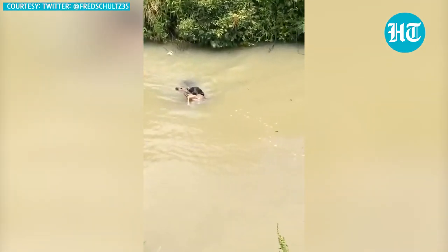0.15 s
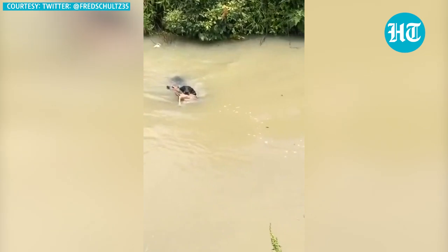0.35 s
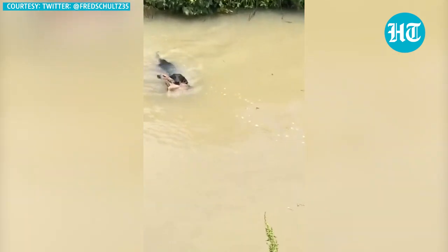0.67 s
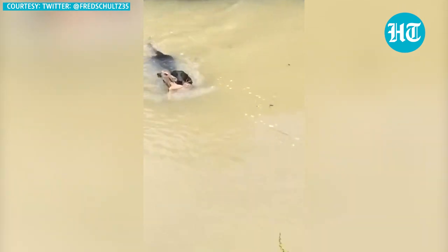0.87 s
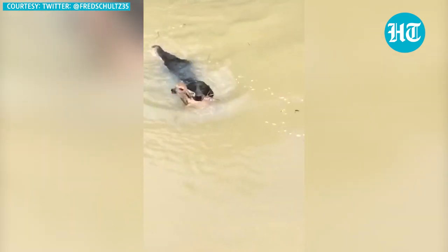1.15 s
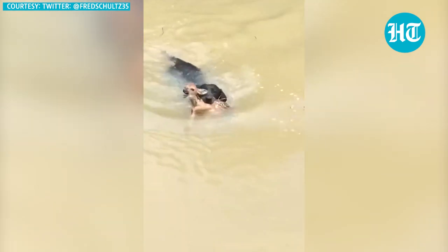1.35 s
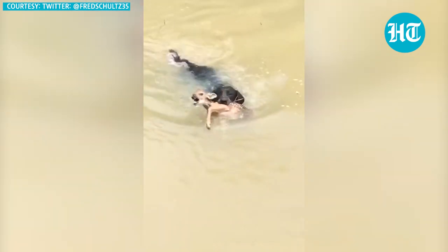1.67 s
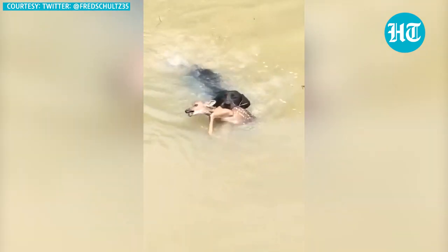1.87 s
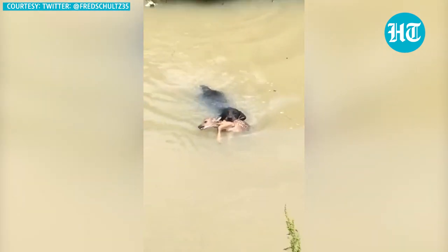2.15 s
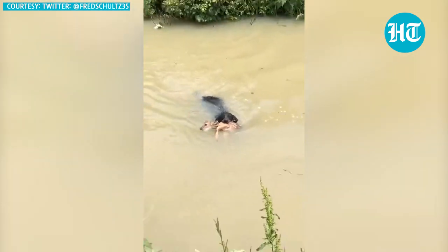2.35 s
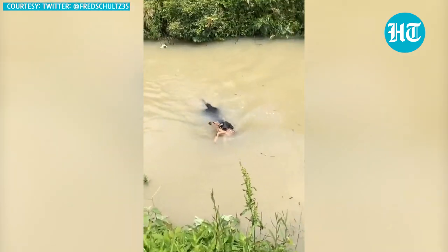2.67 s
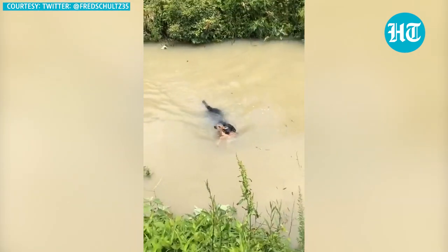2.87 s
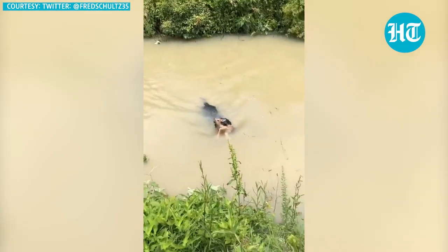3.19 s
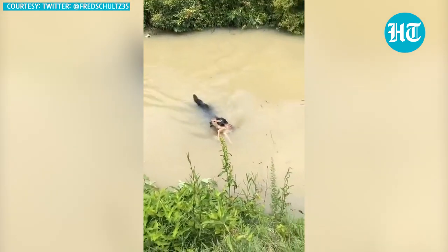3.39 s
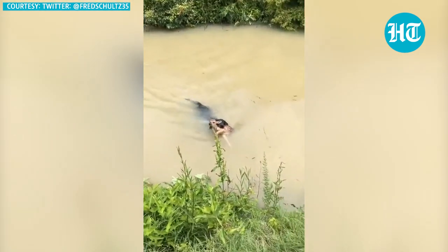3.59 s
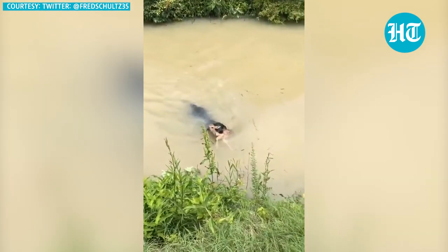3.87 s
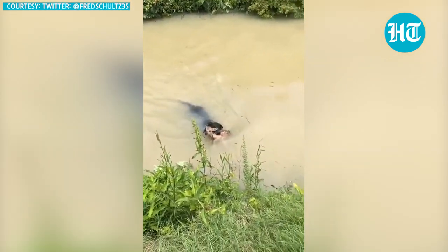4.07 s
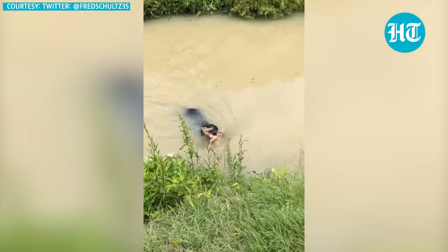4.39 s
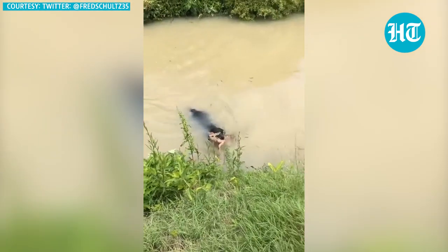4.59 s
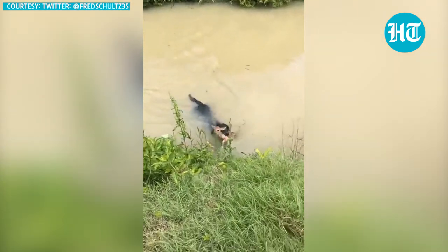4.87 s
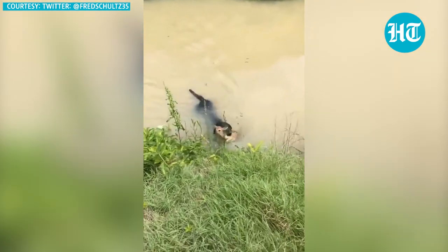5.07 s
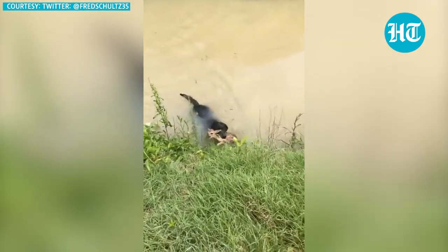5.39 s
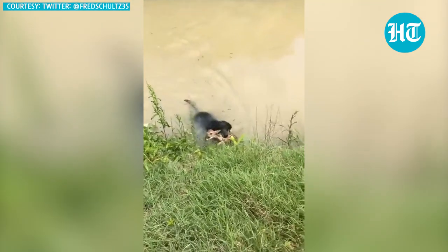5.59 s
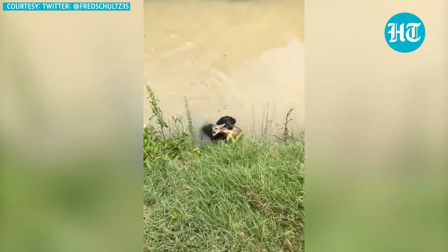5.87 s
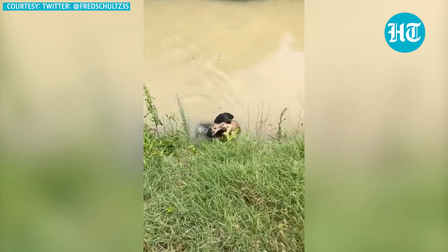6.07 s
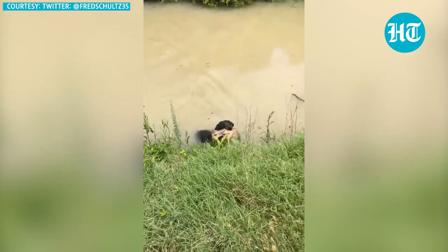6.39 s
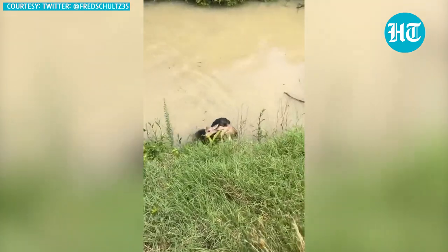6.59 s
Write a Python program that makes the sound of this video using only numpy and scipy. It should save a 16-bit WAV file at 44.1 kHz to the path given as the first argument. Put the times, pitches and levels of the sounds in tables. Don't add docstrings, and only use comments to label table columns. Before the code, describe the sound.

A fawn gives two piercing, strained bleats over a puttering idling engine, lapping muddy water, and a swimming dog's wet snorts.

```python
import sys
import numpy as np
from scipy import signal
from scipy.io import wavfile
from scipy.ndimage import uniform_filter1d

SR = 44100
rng = np.random.default_rng(int(sys.argv[2]) if len(sys.argv) > 2 else 0)


def generate_wav(signal):
    frames = np.transpose(np.atleast_2d(signal))
    scaled = np.clip(frames, -1, 1) * 32767
    pcm = np.round(scaled).astype(np.int16)
    wavfile.write(sys.argv[1], SR, pcm)


def amplitude_ratio(level_db):
    exponent = np.asarray(level_db, float) / 20
    return 10 ** exponent


N = 297234


def at_times(rows):
    s, *columns = np.transpose(rows)
    return [np.interp(np.arange(N) / SR, s, column) for column in columns]


def band(x, low_hz, high_hz):
    return signal.sosfilt(signal.butter(2, [low_hz, high_hz], "band", fs=SR, output="sos"), x)


def unit(x):
    return x / np.sqrt(np.mean(x ** 2) + 1e-20)


def drift(rate):
    r = np.exp(-40 * np.pi * rate / SR)
    slow = signal.lfilter([1], [1, -2 * r, r * r], rng.standard_normal(N // 20 + 3002))[3000:]
    return np.interp(np.arange(N) / 20, np.arange(len(slow)), unit(slow))


def ring(clicks, hz, t60):
    r, w = amplitude_ratio(-60 / (t60 * SR)), 2 * np.pi * hz / SR
    return signal.lfilter([0, np.sin(w)], [1, -2 * r * np.cos(w), r * r], clicks + 1e-18)


def bump(start, length):
    return np.sin(np.pi * np.clip((np.arange(N) / SR - start) / length, 0, 1)) ** 2


def trees(x):
    t = np.arange(int(.6 * SR)) / SR
    tail = band(rng.standard_normal(len(t)), 3000, 4600)
    tail = tail * amplitude_ratio(-60 * t / 0.8) * np.clip(t / .02, 0, 1)
    tail = tail / np.sqrt(np.sum(tail ** 2))
    return signal.fftconvolve(x, tail)[:N] * (1 + .25 * drift(60))


# frequency in Hz, level in dB.
WATER_COLOUR = [(240, -30), (400, -9), (490, -6.5), (676, -5.5), (782, -1.5), (987, -14.5), (1080, -8.5),
                (1570, -9.5), (1930, -9), (2660, -13), (3610, -11), (6750, -33), (13000, -49)]


def river():
    hz, db = np.transpose(WATER_COLOUR)
    edges = 380 * 2 ** np.arange(0, 5.5, 1 / 3)
    white = rng.standard_normal((2, N))
    out, swell = 0, drift(0.87)
    for k, (low, high) in enumerate(zip(edges, edges[1:])):
        colour_db = np.interp(np.log(low * high) / 2, np.log(hz), db)
        flicker_db = .5 * swell + 2.14 * drift(34)
        out = out + amplitude_ratio(colour_db + flicker_db) * band(white[k % 2], low, high)
    return amplitude_ratio(-44) * unit(out)


# start in seconds, peak in dB, note in Hz, t60 in seconds.
DRIPS = [(0.0194, -32.5, 3550, 0.068), (0.5095, -38, 1670, 0.03), (0.8753, -40, 1540, 0.045),
         (2.412, -29, 1560, 0.027), (2.464, -30, 1170, 0.027), (2.9198, -29.5, 3540, 0.018),
         (3.0056, -34.5, 3530, 0.13), (3.3892, -31, 3120, 0.03), (3.4, -27.5, 2710, 0.025),
         (5.03, -36, 1300, 0.057), (6.2714, -29, 3280, 0.034), (6.5194, -29, 2690, 0.022),
         (6.576, -30, 2590, 0.029)]
# start in seconds, peak in dB, note in Hz, t60 in seconds.
GULPS = [(0.489, -32, 600, 0.033), (2.904, -33.5, 684, 0.057), (2.982, -45, 641, 0.05),
         (3.427, -34.5, 1230, 0.046), (5.333, -22.5, 715, 0.035), (5.398, -28.5, 744, 0.049),
         (6.483, -38, 980, 0.062), (6.507, -35, 676, 0.064), (6.581, -31.5, 650, 0.098)]


def drops(rows, rise):
    out, t = np.zeros(N + SR), np.arange(SR // 8) / SR
    for s, db, hz, t60 in rows:
        note = np.sin(2 * np.pi * hz * t * (1 + rise * t))
        start = int(s * SR)
        out[start:start + len(t)] += note * amplitude_ratio(db - 60 * t / t60) * np.clip(t / 0.00085, 0, 1)
    return out[:N]


# start in seconds, peak in dB.
PAW_SLAPS = [
    (1.256, -26),
    (2.287, -26),
    (3.266, -36),
    (4.154, -45),
]
# start in seconds, peak in dB.
TWIG_TICKS = [(0.5294, -54), (0.9153, -48), (1.046, -45.5), (3.4321, -36.5), (3.7294, -54), (3.917, -38),
              (5.055, -48), (6.559, -37)]


def snaps(rows, low_hz, high_hz, t60, lift_db):
    out, t = np.zeros(N + SR), np.arange(SR // 20) / SR
    for s, db in rows:
        start = int(s * SR)
        out[start:start + len(t)] += unit(rng.standard_normal(len(t))) * amplitude_ratio(db + lift_db - 60 * t / t60)
    return band(out[:N], low_hz, high_hz)


# middle in seconds, length in seconds, level in dB.
HISS_SWELLS = [(0.0, .45, -60), (.53, 0.071, -70), (1.29, .28, -56), (1.998, 0.86, -69), (2.253, 0.31, -63),
               (3.273, 0.26, -57), (3.6, 0.41, -71), (4.272, .5, -59), (4.5, 0.41, -58.5), (4.778, 0.51, -55.5),
               (5.306, 0.85, -55), (6.303, 0.6, -59), (6.569, .12, -58), (6.74, 0.38, -61)]


def high_hiss():
    grains = rng.standard_normal(N) * amplitude_ratio(1.0 * drift(120))
    hiss = unit(band(grains, 6700, 10250)) + amplitude_ratio(-4.0) * unit(band(grains, 11200, 14500))
    stirred = sum(amplitude_ratio(db) * bump(s - length / 2, length) for s, length, db in HISS_SWELLS)
    still = amplitude_ratio(-74.5)
    return (still + stirred) * hiss


def rattle(clicks):
    puffs = signal.lfilter([1], [1, -amplitude_ratio(-60 / (.1 * SR))], clicks)
    puffs = uniform_filter1d(puffs, size=200)
    panels = [(156, 205, -35), (339, 377, -46.5)]      # (low Hz, high Hz, dB)
    noise = sum(amplitude_ratio(db) * unit(band(rng.standard_normal(len(clicks)), low, high)) for low, high, db in panels)
    return puffs * noise


# share of the cycle, level in dB.
FIRINGS = [
    (.398, 1),
    (.624, 2.2),
    (.859, -2.6),
]
# resonance in Hz, level in dB, t60 in seconds, polarity.
EXHAUST = [(31, -19.5, 0.49, 1), (38.9, -15, 0.13, -1), (67.5, -10.5, 0.11, 1), (113.6, -28, 0.55, -1),
           (122.5, -25, 0.34, -1), (181, -28, 0.039, -1), (341, -57, 0.13, 1)]
# time in seconds, cycles ahead of a steady idle.
GOVERNOR = [(0.0, -.066), (.35, -.13), (.6, -.087), (1.2, .003), (2.1, -.003), (2.4, -.028), (3.2, -.03),
            (3.85, .038), (4.35, .04), (5.1, -.04), (5.6, -.08), (5.85, -.043), (6.74, -.065)]
IDLE_PER_S = 10.417


def engine():
    s, ahead = np.transpose(GOVERNOR)
    turns = IDLE_PER_S * s + ahead
    lead = SR // 2
    clicks, cycles = np.zeros(N + lead), np.arange(-5, 71)
    cover = 0
    for k, (share, db) in enumerate(FIRINGS):
        fired = cycles + share
        early = np.minimum(fired - turns[0], 0) / IDLE_PER_S
        when = np.interp(fired, turns, s) + early + rng.normal(0, 0.0005, len(cycles))
        inside = fired < turns[-1]
        at = (when * SR + lead).astype(int)[inside]
        clicks[at] = amplitude_ratio(db + rng.normal(0, .9, len(cycles)))[inside]
        if k == 1:
            knock = np.zeros(N + lead)
            knock[at] = amplitude_ratio(rng.normal(0, 1.25, len(cycles)))[inside]
            cover = amplitude_ratio(-36) * ring(ring(knock, 345, .07), 350, .05) / 100
    pipe = sum(np.sign(way) * amplitude_ratio(db) * ring(clicks, hz, t60) for hz, db, t60, way in EXHAUST)
    pipe = signal.sosfilt(signal.butter(4, 700, fs=SR, output="sos"), pipe)
    pole = np.exp(-150 / SR)
    pipe = signal.lfilter([1, -2, 1], [1, -2 * pole, pole ** 2], pipe)
    rumble = amplitude_ratio(-39.0) * unit(band(rng.standard_normal(N), 23, 233))
    return (pipe + cover + rattle(clicks))[lead:] + rumble


# time in seconds, peak in dB.
HAND_KNOCKS = [(2.576, -25), (2.867, -23), (2.235, -29), (5.055, -29), (2.243, -27)]


def knocks():
    clicks = np.zeros(N)
    for s, db in HAND_KNOCKS:
        clicks[int(s * SR)] = amplitude_ratio(db + 27)
    return band(band(clicks, 180, 1300), 180, 1600)


# start in seconds, length in seconds, level in dB.
BUBBLING = [(1.19, 0.31, -41), (2.194, 0.21, -40.5), (2.263, 0.029, -32), (3.185, 0.19, -47),
            (3.235, 0.12, -36.5), (5.28, 0.11, -40.5)]
# start in seconds, length in seconds, level in dB, resonance in Hz, its width in Hz.
BREATHS = [(1.177, 0.23, -46, 3200, 1800), (2.178, 0.16, -43.5, 3350, 1800), (3.158, 0.2, -43, 3160, 1350),
           (4.094, 0.26, -44.5, 2650, 1500), (5.132, 0.31, -45, 4400, 696),
           (5.145, 0.26, -39.5, 1960, 503), (5.164, 0.22, -46, 3330, 500), (5.295, 0.15, -47, 3320, 900),
           (6.407, 0.41, -43, 2890, 1800)]


def snorts():
    white = rng.standard_normal(N)
    pops = (rng.random(N) < 1200 / SR) * amplitude_ratio(3.0 * rng.exponential(1, N).clip(0, 4))
    dealt = rng.integers(0, 6, N)
    sizes_hz = np.geomspace(450, 1250, 6)
    bubbles = unit(sum(ring(pops * (dealt == k), hz, 12 / hz) for k, hz in enumerate(sizes_hz)))
    out = bubbles * sum(amplitude_ratio(db) * bump(s, length) for s, length, db in BUBBLING)
    for s, length, db, hz, width_hz in BREATHS:
        hiss = unit(band(white, hz - width_hz / 2, hz + width_hz / 2))
        out = out + bump(s, length) * amplitude_ratio(db) * hiss
    return out


# time in seconds,
# throat resonance in Hz, throat over lips in dB, lip resonance in Hz.
AIRWAY_ONE = [(1.394, 2920, 17, 4560), (1.429, 3320, 11.5, 4460), (1.467, 3220, 21.5, 4650),
              (1.579, 3250, 8.5, 4730), (1.626, 3084, 5, 4559), (1.692, 3170, -5.5, 4568),
              (1.743, 3290, 10, 4650), (1.773, 3630, 13, 4348), (1.812, 3340, 0, 4080)]
AIRWAY_TWO = [(5.483, 3480, 2, 4600), (5.573, 3100, 1, 3990), (5.617, 3220, 8, 4440),
              (5.735, 3370, 0.5, 4360), (5.774, 3200, 7.5, 4520), (5.86, 3160, 3.7, 4100),
              (5.871, 3480, 4.5, 4500), (6.008, 3060, 10.5, 4540), (6.059, 3030, 6.5, 3900)]


def airway(rows, hz, span):
    throat_hz, throat_db, lips_hz = [column[span] for column in at_times(rows)]
    width_hz = 256
    throat, lips = [1 / (1 + ((hz - centre) / width_hz) ** 2) ** 2 for centre in (throat_hz, lips_hz)]
    return 10 * np.log10(amplitude_ratio(throat_db) ** 2 * throat + lips)


# start in seconds, end in seconds,
# period-three wobble from 0 to 1, hoarse breath from 0 to 1.
STRAINS = [
    (1.425, 1.56, .04, .08),
    (1.56, 1.645, .33, .17),
    (5.595, 5.855, .03, .034),
    (5.885, 6.04, .03, .032),
    (6.04, 6.1, .08, .08),
]


def strain(t):
    on = [.5 * (np.tanh((t - start) / .008) - np.tanh((t - end) / .008)) for start, end, *_ in STRAINS]
    wobble, hoarse = np.array(STRAINS)[:, 2:].T @ on
    ends = .5 * np.exp(-(t - t[0]) / .018) + .15 * np.exp(-(t[-1] - t) / .025)
    return wobble, .004 + hoarse + ends


# time in seconds, pitch in Hz,
# effort in dB, mouth resonance in Hz.
VOICE_ONE = [(1.382, 682, -69, 1870.0), (1.394, 685, -32, 1940), (1.432, 679, -18.5, 2000),
             (1.484, 711.5, -21, 1950.0), (1.578, 722.8, -10, 1790), (1.7, 700.2, -2.5, 2070),
             (1.746, 693.3, -16.5, 1940.0), (1.796, 680.4, -28.5, 1860.0), (1.835, 610, -39, 1916.0)]
VOICE_TWO = [(5.462, 757, -40, 1350), (5.514, 654.4, -11.5, 1340), (5.572, 666.8, -12.5, 1420),
             (5.74, 671.8, -10, 1980), (5.842, 677.5, -11, 1580), (6.0, 671.5, -14, 1670),
             (6.046, 651.6, -11.5, 2100), (6.082, 527, -22.5, 1720), (6.105, 564, -40, 1660)]
# multiple of the pitch, level against the effort
# in the first cry in dB, in the second cry in dB.
PARTIALS = [(1, -19.5, -24), (2, -18, -7.5), (3, -13.5, -6), (8, -16, -15), (9, -25, -19), (10, -48.5, -24),
            (11, -24, -34.5), (12, -22, -28.5), (13, -25, -20.5), (14, -36, -27), (15, -39, -36),
            (16, -41, -42), (17, -42, -42), (18, -62, -36.5), (19, -56, -50)]
# time in seconds, dip in dB, skip in cycles.
CRACKS = [(1.445, 12, .1), (1.459, 7, -.06), (1.48, 16, .1), (1.497, 5, .05), (1.522, 11, -.08),
          (1.559, 5, .07), (1.575, 4, .06), (1.607, 8, -.06), (5.708, 5, .05), (5.758, 12, .09),
          (5.862, 9, .08), (5.65, 3, .05), (5.81, 4, .05), (5.91, 6, -.07), (5.961, 7, .03),
          (6.028, 6, .04)]
LINGER = (.05, 0.49)


def cry(rows, shape, which):
    first, last = int(rows[0][0] * SR), int(rows[-1][0] * SR)
    span = slice(first, last)
    muscle = int(.012 * SR)
    pitch, push_db, mouth_hz = [uniform_filter1d(column, size=muscle)[span] for column in at_times(rows)]
    t = np.arange(first, last) / SR
    since, left = t - t[0], t[-1] - t

    strong_db = push_db + airway(shape, np.arange(4, 8)[:, None] * pitch, span)
    effort_db = np.minimum(10 * np.log10(sum(amplitude_ratio(2 * db) for db in strong_db)), -12)
    wobble, hoarse = strain(t)
    hoarse = hoarse * amplitude_ratio(4 * drift(45)[span])
    bright_db = (26, 8)[which] * np.exp(-since / .02)
    closed = 1 - np.clip(np.minimum(since / .07, left / .1), 0, 1) ** .8

    levels = {k: db + 1.2 * drift(35)[span] for k, db in zip(range(4, 8), strong_db)}
    for row in PARTIALS:
        k = round(row[0])
        level = effort_db + row[1 + which] + 2.7 * drift(20)[span]
        if k < 4:
            mouth_db = -10 * np.log10(1 + ((k * pitch - mouth_hz) / 250) ** 2)
            levels[k] = level - LINGER[which] * (effort_db + 14.5) + 0.5 + mouth_db
        else:
            levels[k] = level + bright_db - 24 * closed
    levels[3] = levels[3] - 15.0 * np.exp(-since / 0.048)

    cycles = np.cumsum(pitch * (1 + .0012 * drift(40)[span])) / SR
    skipped = sum(skip * .5 * np.tanh((t - s) / .0015) for s, db, skip in CRACKS)
    dip_db = sum(-db * np.exp(-((t - s) / .0018) ** 2) for s, db, skip in CRACKS)
    shake = band(rng.standard_normal((2, len(t))), 40, 320)
    cycles = cycles + .1 * hoarse * unit(shake[0]) / 5
    flutter = 1 + .35 * hoarse * unit(shake[1])

    voice = 0
    for k, db in levels.items():
        fuzz = band(rng.standard_normal((2, len(t))), 20, 120)
        cracked = 1 / (1 + ((k - 5.6) / 1.9) ** 4)
        breath = hoarse * (.25 + .9 * cracked + .16 * max(k - 6, 0))
        angle = 2 * np.pi * (k * (cycles + cracked * skipped) + 0.36 * drift(2.36)[span])
        third = wobble * np.cos(2 * np.pi * (cycles / 3 + rng.random()))
        tone = (1 + third + breath * unit(fuzz[0])) * np.cos(angle)
        tone = tone + breath * unit(fuzz[1]) * np.sin(angle)
        voice = voice + amplitude_ratio(db + cracked * dip_db) * tone
    rush = unit(band(rng.standard_normal(len(t)), 4500, 7500))
    voice = voice + amplitude_ratio(effort_db - 15) * (hoarse + closed ** 2) * rush
    edge = np.clip(np.minimum(since, left) / 0.013, 0, 1)
    out = np.zeros(N)
    out[span] = np.sqrt(2) * voice * flutter * edge
    return out


def scene():
    cry_one = cry(VOICE_ONE, AIRWAY_ONE, which=0)
    cry_two = cry(VOICE_TWO, AIRWAY_TWO, which=1)
    fawn = cry_one + cry_two
    echo = trees(amplitude_ratio(-41) * cry_one + amplitude_ratio(-37) * cry_two)
    water = river() + snorts() + drops(DRIPS, rise=0.31) + drops(GULPS, rise=2.8)
    water = water + snaps(PAW_SLAPS, 300, 1500, .018, lift_db=10) + knocks()
    bank = high_hiss() + snaps(TWIG_TICKS, 2600, 9000, .035, lift_db=0)
    loudness = np.sqrt(uniform_filter1d(fawn ** 2, size=1500) + 1e-12)
    duck = amplitude_ratio(-15 * np.clip(loudness / .2, 0, 1))
    return (fawn + echo + engine() + duck * (water + bank))[None]


def roll_off(x):
    return signal.sosfilt(signal.butter(12, 15850, fs=SR, output="sos"), x)


def record(dry):
    heard = signal.sosfilt(signal.ellip(10, .5, 70, 13100, fs=SR, output="sos"), dry)
    return roll_off(np.clip(heard, -1, 1))


dry = scene()
out = record(dry)
generate_wav(out)
```